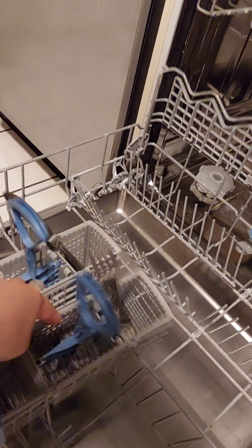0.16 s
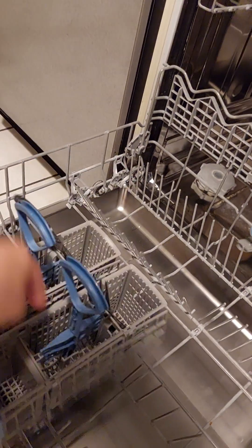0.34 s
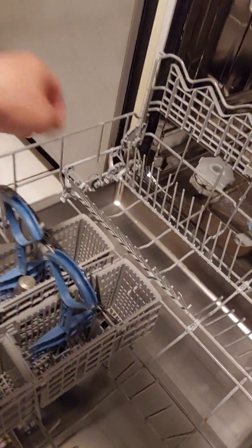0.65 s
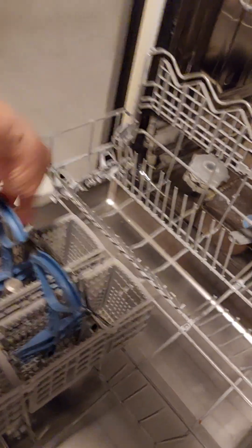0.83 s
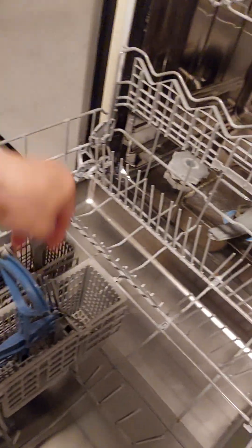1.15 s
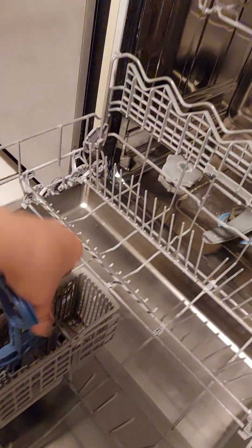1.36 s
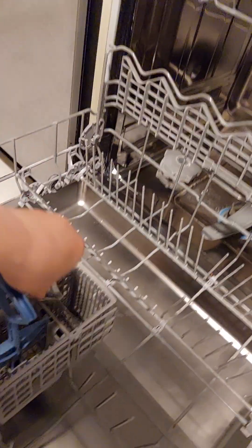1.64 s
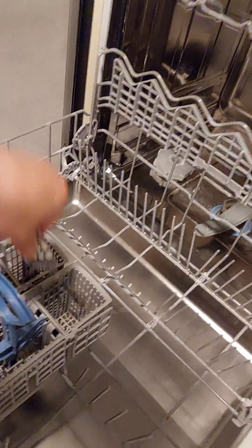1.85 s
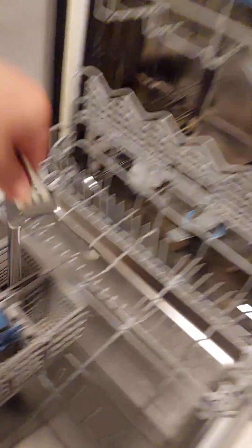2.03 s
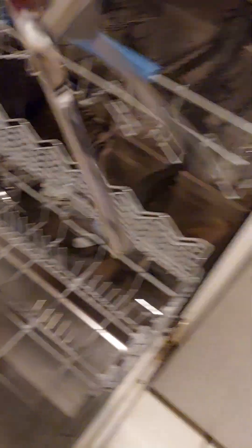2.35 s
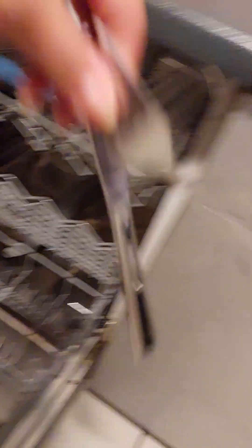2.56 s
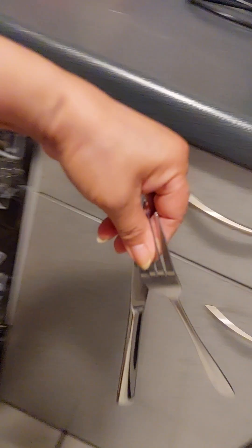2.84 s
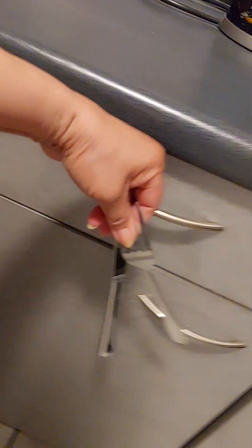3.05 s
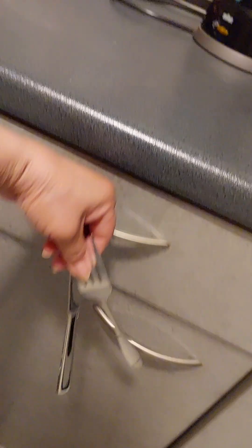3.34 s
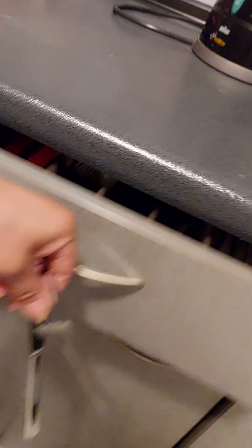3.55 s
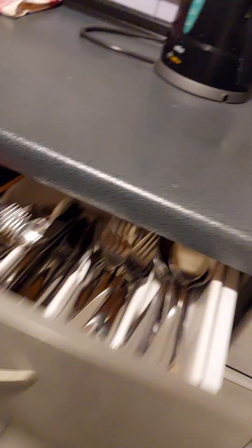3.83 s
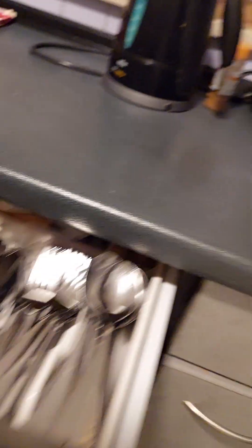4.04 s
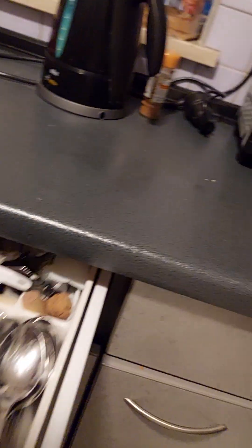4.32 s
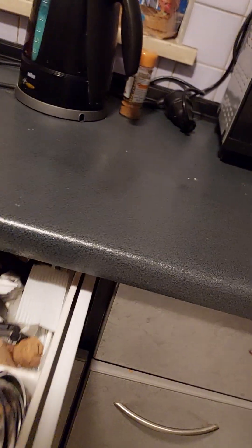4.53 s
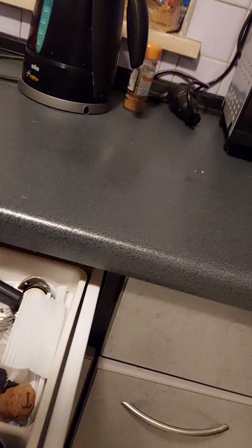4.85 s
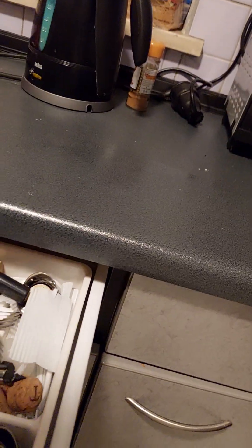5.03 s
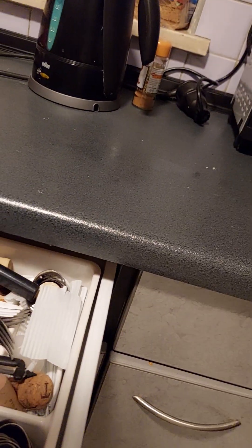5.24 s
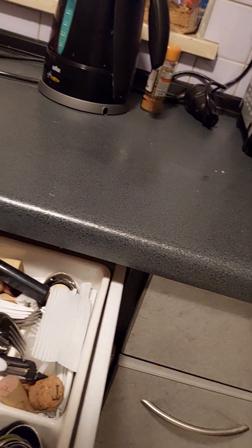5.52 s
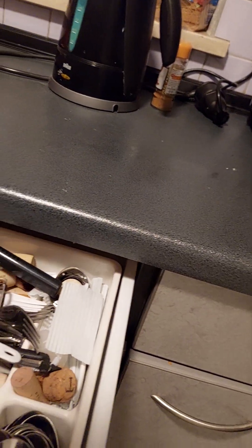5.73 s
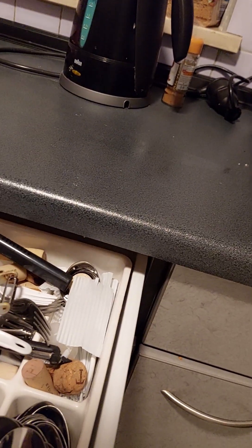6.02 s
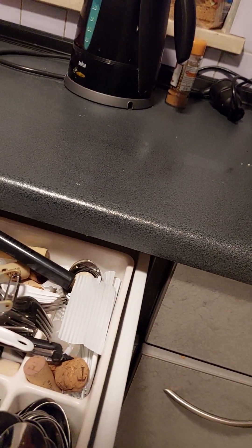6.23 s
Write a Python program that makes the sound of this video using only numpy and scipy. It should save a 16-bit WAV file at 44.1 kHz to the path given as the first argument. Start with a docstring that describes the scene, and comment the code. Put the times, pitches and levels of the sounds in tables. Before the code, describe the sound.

In a small hard kitchen, close up in stereo, a plastic basket of cutlery thumps and jingles into a dishwasher, leaving the wire rack humming and buzzing. Softer knocks and clinks follow as a knife and fork are drawn out. After a near-quiet gap a drawer rumbles open, bangs against its stop, and the pieces fall clattering and ringing onto other cutlery.

```python
"""A small hard kitchen, heard from arm's length. A plastic cutlery basket is set down in a dishwasher,
whose wire rack hums on in close beating modes. A knife and fork are drawn out and tick together in the hand.
A drawer rolls open (swept resonances over rumble) and bangs against its stop; the pieces drop on the cutlery
in its tray. Blows are noise flurries through coloured bodies, pieces ring in split modes, scrapes are
strokes of gritty noise; a diffuse echo and steady room noise surround them."""
import sys
import numpy as np
from scipy import signal
from scipy.fft import rfft, irfft, next_fast_len
from scipy.io import wavfile

SR = 44100
rng = np.random.default_rng(int(sys.argv[2]) if len(sys.argv) > 2 else 0)


def generate_wav(sig):
    """Save sig (samples, or channels by samples) to the path in sys.argv[1] as 16-bit PCM at SR."""
    pcm = np.round(np.clip(np.atleast_2d(sig).T, -1, 1) * 32767).astype(np.int16)
    wavfile.write(sys.argv[1], SR, pcm)


N = 281358
TIME = np.arange(N) / SR


def from_db(db):
    """Amplitude ratio of a level."""
    return 10 ** (np.asarray(db) / 20)


def rms_one(x):
    """Scale to rms 1."""
    return x / np.sqrt(np.mean(x ** 2) + 1e-20)


def at_hz(points, hz):
    """Read a table on a log-frequency axis."""
    table_hz, values = np.array(points).T
    return np.interp(np.log(np.maximum(hz, 1)), np.log(table_hz), values)


def band(x, low_hz, high_hz):
    """Causal band-pass."""
    return signal.sosfilt(signal.butter(3, [low_hz, high_hz], "band", fs=SR, output="sos"), x)


def through(x, response):
    """Convolve each channel with an impulse response, cut to the scene's length."""
    return signal.oaconvolve(x, np.atleast_2d(response), axes=1)[:, :N]


def resonator(hz, width_hz):
    """Filter coefficients of a resonance with gain 1 on top."""
    r = np.exp(-np.pi * width_hz / SR)
    feedback = [1, -2 * r * np.cos(2 * np.pi * hz / SR), r * r]
    return (1 - r * r) / 2 * np.array([1, 0, -1]), feedback


def drift(rate_hz):
    """Slow random curve, rms 1."""
    knots = rng.standard_normal(int(N / SR * rate_hz) + 2)
    return rms_one(np.interp(TIME * rate_hz, np.arange(len(knots)), knots))


def swell(start_s, attack_s, hold_s, release_db_per_s):
    """Envelope that rises, holds until hold_s after its start and dies away."""
    age_s = TIME - start_s
    return np.clip(age_s / attack_s, 0, 1) * from_db(-release_db_per_s * np.maximum(age_s - hold_s, 0))


def causal(colour, size=4096):
    """Minimum-phase impulse response of a colour, by folding its cepstrum."""
    cepstrum = irfft(np.log(from_db(at_hz(colour, np.fft.rfftfreq(size, 1 / SR)))))
    cepstrum[1:size // 2] *= 2
    cepstrum[size // 2 + 1:] = 0
    return irfft(np.exp(rfft(cepstrum)))


# Left-right likeness of diffuse sound. Each row: frequency in Hz, correlation (-1 to 1).
LIKENESS = [(150, 0.81), (300, 0.97), (600, .55), (1200, 0.047), (2500, -.2), (5000, 0.02)]


def two_ears(x):
    """Mix two unrelated signals until they are alike in the bass, where the waves are long."""
    size = next_fast_len(x.shape[1])
    likeness = at_hz(LIKENESS, np.fft.rfftfreq(size, 1 / SR))
    angle = np.arcsin(np.clip(likeness, -1, 1)) / 2
    spectrum = rfft(x, size)
    mixed = np.cos(angle) * spectrum + np.sin(angle) * spectrum[::-1]
    return irfft(mixed, size)[:, :x.shape[1]]


def noise(colour, grain_db=0):
    """Coloured stereo noise, gritty when its grains differ in size; rms 1."""
    grains = rng.standard_normal((2, N)) * from_db(grain_db * drift(400))
    return rms_one(two_ears(through(grains, causal(colour))))


# Colour of the quiet room. Each row: frequency in Hz, relative level in dB.
QUIET_COLOUR = [(15, -39.5), (25, -7.5), (64, 2.5), (190, -4.5), (249, 0), (405, -12.5), (887, -23),
                (2690, -27), (3250, -27.5), (11300, -29), (16000, -34)]
QUIET_DB = -66.5


def quiet_room():
    """Steady coloured noise of the room."""
    return from_db(QUIET_DB) * noise(QUIET_COLOUR)


# Decay of the kitchen's echo. Each row: frequency in Hz, t60 in s.
KITCHEN_DECAY = [(100, .45), (1500, 0.39), (4000, 0.37), (9000, 0.27), (15000, 0.24)]


def kitchen(size=26000):
    """Diffuse echo of about unit energy; the treble dies first."""
    t, edges_hz = TIME[:size], np.geomspace(40, 19000, 13)
    spectrum = rfft(two_ears(rng.standard_normal((2, size))))
    hz, tail = np.fft.rfftfreq(size, 1 / SR), 0
    for low, high in zip(edges_hz, edges_hz[1:]):
        t60_s = at_hz(KITCHEN_DECAY, np.sqrt(low * high))
        part = irfft(spectrum * ((hz >= low) & (hz < high)), size) * from_db(-60 * t / t60_s)
        part = part * (1 - np.exp(-t / 0.00053))    # soft onset
        tail = tail + rms_one(part) * np.sqrt((high - low) / (SR / 2) / size)
    return tail


# Pushes that set the rack swaying. Each row: start in seconds, level in dB, t60 in s.
RACK_PUSHES = [(.12, -27, 2.2), (.52, -34, 1.32), (1.26, -40, 0.95), (1.529, -43, 1.4), (1.88, -43.5, 1.0)]
# Close modes of the rack. Each row: frequency in Hz, relative level in dB.
RACK_MODES = [(234.5, -2.5), (227, -8), (214.7, -11)]
# Loose wires and handles that buzz. Each row: frequency in Hz, width in Hz, relative level in dB.
RACK_BUZZ = [(1165, 72, -4), (2300, 150, -3), (3180, 110, 0), (4640, 170, -3), (7300, 90, -11)]
RACK_RISE_S = 0.048


def rack(waver_rad, hum_db, buzz_db, chatter_db, buzz_growth):
    """Pushes set the wire rack humming in modes that beat; the harder it sways, the more loose parts chatter."""
    power = 0
    for start_s, push_db, t60_s in RACK_PUSHES:
        push = from_db(push_db) * swell(start_s, RACK_RISE_S, RACK_RISE_S, 60 / t60_s)
        power = power + push ** 2
    sway = np.sqrt(power)
    hum = 0
    for hz, db in RACK_MODES:
        hum = hum + from_db(db) * np.sin(2 * np.pi * hz * TIME + waver_rad * drift(16))
    touches = rng.standard_normal((2, N)) * from_db(chatter_db * drift(70))
    buzz = 0
    for hz, width_hz, db in RACK_BUZZ:
        buzz = buzz + from_db(db) * rms_one(signal.lfilter(*resonator(hz, width_hz), touches))
    looseness = (sway / sway.max()) ** buzz_growth
    return sway * (from_db(hum_db) * rms_one(hum) + from_db(buzz_db) * looseness * rms_one(buzz))


PULL_S, PULL_LENGTH_S, STOP_S = 3.456, 0.38, 4.83
SPEED_LEFT_AT_STOP = 0.49   # share of the top speed


def drawer_motion():
    """Speed (top 1) and travel (0 to 1): pulled up to speed, the drawer coasts and slows until its stop."""
    speed = np.interp(TIME, [PULL_S, PULL_S + PULL_LENGTH_S, STOP_S], [0, 1, SPEED_LEFT_AT_STOP], right=0)
    return speed, np.cumsum(speed) / np.sum(speed)


def swept(x, centre_hz, width_hz, size=512):
    """Resonance that follows a moving centre, block by block; rms 1."""
    out, state = np.zeros((2, N)), np.zeros((2, 2))
    for i in range(0, N, size):
        coefficients = resonator(centre_hz[i], width_hz)
        out[:, i:i + size], state = signal.lfilter(*coefficients, x[:, i:i + size], zi=state)
    return rms_one(out)


# Colour of the rolling. Each row: frequency in Hz, relative level in dB.
ROLL_COLOUR = [(24, -46), (40, -11), (112, -11.5), (147, 0.5), (183, -6), (346, -4.5), (487, -2.5),
               (593, -11), (856, -12.5), (1540, -23), (14000, -52)]
ROLL_DB = -41.5   # mean at top speed, before the mix of rumble and rails
LOWER_RUNNER_HZ, UPPER_RUNNER_HZ = (240.5, 411), (1138, 640)   # shut, fully out


def runners(rumble_db, lower_db, upper_db):
    """Rollers rumble along the rails, louder with speed, and excite resonances that shift with the travel."""
    speed, travel = drawer_motion()
    lower_hz = np.interp(travel, [0, 1], LOWER_RUNNER_HZ)
    upper_hz = np.interp(travel, [0, 1], UPPER_RUNNER_HZ)
    rumble = from_db(rumble_db) * noise(ROLL_COLOUR, grain_db=-0.5)
    drive = noise(ROLL_COLOUR, grain_db=1.5)
    rails = from_db(lower_db) * swept(drive, lower_hz, width_hz=19)
    rails = rails + from_db(upper_db) * swept(drive, upper_hz, width_hz=57)
    return speed * from_db(ROLL_DB + 2.26 * drift(35)) * (rumble + rails)


# Soft scrapes and sliding cutlery.
# Each row: start in seconds, length in s, level in dB, brightness in dB per octave.
SCRAPES = [(1.808, 0.34, -57.5, -4), (1.897, .11, -58, -1), (2.518, 0.037, -66.5, -2.5),
           (2.65, 0.042, -65, -1.5), (2.897, 0.069, -57.5, 1.5), (3.15, 0.024, -57, -3),
           (3.492, 0.24, -69.5, -4.5), (3.99, .06, -64, -2), (4.065, 0.049, -56, -.5),
           (4.215, 0.14, -50, -.5)]
# Colour of sliding steel. Each row: frequency in Hz, relative level in dB.
SLIDE_COLOUR = [(1200, -7.5), (2400, 2), (3300, -4), (7200, -5.5), (9000, -8.5), (11400, -3.5), (16000, -8)]
SCRAPE_ATTACK_SHARE, SCRAPE_RELEASE_DB_PER_S = 0.27, 396.5   # attack: share of the stroke's length


def scrapes():
    """Strokes of fine friction noise, each with its own brightness; the short ones start sharply."""
    out = 0
    for start_s, length_s, stroke_db, brightness in SCRAPES:
        colour = [(hz, db + brightness * np.log2(hz)) for hz, db in SLIDE_COLOUR]
        stroke = swell(start_s, SCRAPE_ATTACK_SHARE * length_s, length_s, SCRAPE_RELEASE_DB_PER_S)
        out = out + from_db(stroke_db) * stroke * noise(colour, grain_db=-1)
    return out


def rattle(blows, contacts, count, grain_db, size=10000):
    """Each blow is a dying flurry of uneven bounces, shared out among the registers by its contact."""
    out, t = np.zeros((count, 2, N + size)), TIME[:size]
    for start_s, length_s, blow_db, contact, _ in blows:
        bounces = np.repeat(from_db(grain_db * rng.standard_normal(size // 40)), 40)
        flurry = rng.standard_normal((count, 2, size)) * bounces * np.exp(-t / length_s)
        # energy grows with length
        flurry *= np.sqrt(length_s * SR / 2 / np.sum(flurry ** 2, axis=2, keepdims=True))
        start = round(start_s * SR)
        gains = from_db(blow_db + np.array(contacts[contact]))
        out[..., start:start + size] += flurry * gains[:, None, None]
    return out[..., :N]


def pile(count=260, size=12000):
    """Cutlery in a heap: scattered modes, quickly damped by the neighbours; unit energy."""
    t = TIME[:size]
    hz = rng.uniform(2500, 16000, (count, 1))
    t60_s = 0.1 * rng.uniform(0.52, 2.4, (count, 1))
    strength = rng.standard_normal((count, 1))
    modes = strength * np.sin(2 * np.pi * hz * t) * from_db(-60 * t / t60_s)
    return rms_one(np.sum(modes, axis=0)) / np.sqrt(size)


def struck(blows, contacts, colour, registers, grain_db, hollows=(), pile_db=-60):
    """A body answers each blow in every register as its contact drives it; the heap in it jingles."""
    plain = causal(colour)
    body = plain
    for hz, width_hz, db in hollows:
        body = body + from_db(db) * signal.lfilter(*resonator(hz, width_hz), plain) / 2
    jingle = from_db(pile_db) * pile()
    jingle[0] += 1    # the blow itself
    body, out = signal.fftconvolve(body, jingle), 0
    for drive, (low_hz, high_hz) in zip(rattle(blows, contacts, len(registers), grain_db), registers):
        response = band(body, low_hz, high_hz)
        out = out + through(drive, response / np.sqrt(np.sum(response ** 2)))
    return two_ears(out)


# Registers of a blow: thud, knock, clack, steel. Each row: low edge in Hz, high edge in Hz.
REGISTERS = [(55, 300), (300, 1800), (1800, 7000), (7000, 17000)]
# Knocks of the loaded basket.
# Each row: start in seconds, rattle decay in s, level in dB, contact, piece left ringing.
BASKET_BLOWS = [(.002, .019, -35, "bump", None), (.081, .06, -42.5, "knock", None),
                (.111, .005, -21, "slap", None), (.117, .028, -20.5, "bump", None),
                (.166, .02, -23.5, "jostle", None), (.194, 0.011, -14.5, "jostle", None),
                (.199, 0.01, -10, "slap", None), (.209, .036, -26, "knock", None),
                (.25, 0.011, -15, "jostle", None), (.264, .013, -20.5, "jostle", None),
                (.317, .022, -26, "knock", None), (.357, .03, -42, "bump", None),
                (.55, 0.1, -52, "bump", None), (.8, 0.12, -61, "bump", None),
                (.986, 0.0114, -48.5, "bump", None), (1.09, 0.011, -52, "knock", None),
                (1.115, 0.023, -44.5, "thud", None), (1.221, 0.0082, -40.5, "knock", None),
                (1.238, 0.019, -41.5, "knock", None), (1.274, 0.015, -37.5, "knock", None),
                (1.297, 0.0061, -30, "thud", None), (1.55, .015, -42, "thud", None),
                (1.7, 0.064, -51.5, "bump", None), (1.765, 0.051, -47, "bump", None),
                (1.93, .018, -48.5, "knock", "tines"), (1.99, 0.018, -46, "bump", "tines")]
# Ways the basket is knocked. Each row: thud in dB, knock in dB, clack in dB, steel in dB.
BASKET_CONTACTS = { "thud": (1.5, -8, -17, -37), "bump": (0, -4.5, -10.5, -20.5),
                   "knock": (-0.5, -0.5, 0.5, -8), "slap": (-13, -1.5, -2, -17.5),
                   "jostle": (-10, -12.5, 0.5, -4.5), }
# Colour of the basket. Each row: frequency in Hz, relative level in dB.
BASKET_COLOUR = [(24, -47.5), (40, -18.5), (69, -6), (167, -7), (209, 2.5), (556, -10.5), (831, -16),
                 (1090, -11.5), (1550, -16.5), (2210, -16), (4030, -26), (12500, -29), (16000, -31)]


def basket():
    """The plastic basket knocks and its load of cutlery jingles."""
    return struck(BASKET_BLOWS, BASKET_CONTACTS, BASKET_COLOUR, REGISTERS, grain_db=4, pile_db=-11.0)


# Light touches of steel on steel.
# Each row: start in seconds, rattle decay in s, level in dB, contact, piece left ringing.
CLINK_BLOWS = [(0.492, 0.018, -38.5, "handle", None), (0.519, 0.017, -36.5, "handle", None),
               (.657, 0.0047, -45.5, "handle", None), (0.715, 0.016, -49.5, "handle", None),
               (0.987, 0.0088, -37.5, "shaft", None), (1.533, 0.016, -42.5, "shaft", "blade"),
               (2.336, 0.0014, -34.5, "tip", "tines"), (2.426, .003, -53, "tip", None),
               (2.49, 0.0017, -40, "tip", None), (2.566, 0.0009, -36.5, "tip", None)]
# Ways two pieces touch. Each row: clack in dB, steel in dB.
CLINK_CONTACTS = {"handle": (0, -14), "shaft": (-6, 0), "tip": (-21, 0)}
# Colour of the clinks. Each row: frequency in Hz, relative level in dB.
CLINK_COLOUR = [(1500, 5.5), (4700, 2), (5800, -5.5), (7000, 0.5), (9000, -10.5), (15000, -4)]


def clinks():
    """Pieces tick together, in the two upper registers only."""
    return struck(CLINK_BLOWS, CLINK_CONTACTS, CLINK_COLOUR, REGISTERS[2:], grain_db=2.5)


# A soft footfall, then blows in the drawer and tray: pull, end stop and rebound, knife touching down,
# fall and bounce, settling.
# Each row: start in seconds, rattle decay in s, level in dB, contact, piece left ringing.
DRAWER_BLOWS = [ (3.099, .02, -69, "soft bump", None), (3.57, 0.045, -62.5, "soft bump", None),
                (3.772, 0.03, -31.5, "heap jolted", None), (3.789, .023, -27, "heap jolted", None),
                (4.584, 0.0032, -59, "soft bump", None), (4.819, 0.011, -28, "end stop", None),
                (4.828, 0.022, -20.5, "end stop", None), (4.835, .016, -13.5, "end stop", None),
                (4.846, 0.027, -15.5, "heap jolted", None),
                (4.85, 0.021, -29.5, "cabinet shudder", "carcass"),
                (4.96, 0.026, -39, "cabinet shudder", "carcass"), (5.015, 0.0052, -26.5, "end stop", None),
                (5.128, 0.021, -32.5, "steel on steel", "knife"), (5.169, 0.0099, -27, "heap jolted", None),
                (5.231, 0.0048, -33, "steel on steel", None), (5.275, 0.006, -42, "steel on steel", None),
                (5.299, 0.17, -32.5, "steel on steel", "knife"), (5.335, .01, -20, "handle on tray", None),
                (5.356, 0.0042, -17, "handle on steel", None), (5.364, .011, -15.5, "heap jolted", None),
                (5.378, .03, -19.5, "steel on steel", "fork"), (5.416, 0.0028, -17, "handle on tray", None),
                (5.438, 0.033, -24, "handle on steel", "fork"),
                (5.46, 0.0022, -13.5, "flat landing", "fork"),
                (5.625, .013, -34.5, "handle on steel", None),
                (5.685, 0.0066, -21.5, "steel on steel", None),
                (5.81, 0.044, -31, "steel on steel", "fork"), (5.837, 0.0099, -26, "flat landing", None),
                (5.88, 0.017, -31.5, "flat landing", None), (5.932, .0024, -37, "handle on steel", None),
                (5.971, .056, -32, "steel on steel", "fork"), (5.983, .015, -23.5, "flat landing", "fork"),
                (6.045, 0.023, -26.5, "steel on steel", None), (6.072, .014, -30.5, "handle on tray", None),
                (6.18, 0.0045, -45.5, "soft bump", None), (6.293, 0.048, -39.5, "steel on steel", "spoon"),
                (6.326, 0.011, -32, "soft bump", None)]
# What meets what. Each row: thud in dB, knock in dB, clack in dB, steel in dB.
DRAWER_CONTACTS = { "end stop": (-14, -1.5, -3.5, -15), "cabinet shudder": (0, -12, -25, -40),
                   "soft bump": (-18, -0.5, -12.5, -35), "heap jolted": (-16, -9, -7, -1),
                   "steel on steel": (-36.5, -15.5, -6.5, -1.5), "handle on steel": (-33, -11.5, -3, -5.5),
                   "handle on tray": (-38, -1, -2.5, -7), "flat landing": (-31.5, -4, -2.5, -2), }
# Colour of the drawer. Each row: frequency in Hz, relative level in dB.
DRAWER_COLOUR = [(24, -18), (40, -4), (81, -15), (151, -10.5), (180, -12), (320, -6.5), (412, -7.5),
                 (810, -3), (1520, -6), (2840, -6), (5720, -11.5), (12800, -5.5), (16000, -4.5)]
# Hollow resonances of the tray. Each row: frequency in Hz, width in Hz, relative level in dB.
TRAY_HOLLOWS = [(354, 25, 1.5), (818, 82, 0.5)]


def drawer():
    """All these blows share one body with the tray's hollow resonances and jingling cutlery."""
    return struck(DRAWER_BLOWS, DRAWER_CONTACTS, DRAWER_COLOUR, REGISTERS, grain_db=2.5,
                  hollows=TRAY_HOLLOWS, pile_db=-16.5)


# Modes of each piece. Each row: nominal frequency in Hz, nominal level in dB, t60 in s.
PIECE_MODES = { "blade": [(4500, -17, 0.22), (6700, 1, 0.074), (11360, -7, 0.12), (12600, -1.5, 0.18),
               (14500, 5, 0.12)], "tines": [(7950, -19, 0.11), (11240, -5, 0.16)],
               "knife": [(6250, -1, 0.12), (10010, -20, .4), (11000, 8, 0.26), (12340, 2, 0.39),
               (14700, -12, .5)], "fork": [(7951, -10, .42), (9508, -8, .3), (11086, -1, .26),
               (11718, -9, .26), (12707, -1, .26), (14358, 0, .25), (14733, -8, .26)],
               "spoon": [(9930, -14, 0.29), (11300, 0, 0.16), (12720, 5, 0.12), (14163, -13.5, 0.59)],
               "carcass": [(83.5, -2.5, 0.43), (108.2, -9, 0.63), (147, -2, 0.34)], }
# How strongly each piece rings, in dB, after a blow that rattles for TYPICAL_RATTLE_S.
PIECE_RING_DB = {"blade": 1, "tines": -2.5, "knife": -15, "fork": -1.5, "spoon": -2, "carcass": -3}
TYPICAL_RATTLE_S = .03


def ringing(blows, spread_db, split_hz, size=30000):
    """Free pieces ring with the blow's energy, in new mode strengths; each mode is a beating cluster."""
    out, t = np.zeros((2, N + size)), TIME[:size]
    for start_s, length_s, blow_db, _, piece in blows:
        if piece is None:
            continue
        start = round(start_s * SR)
        ring_db = blow_db + 10 * np.log10(length_s / TYPICAL_RATTLE_S) + PIECE_RING_DB[piece]
        for hz, mode_db, t60_s in PIECE_MODES[piece]:
            shortness = min(hz / 10000, 1)
            decay = from_db(-60 * t / t60_s)
            for share, detune in ((.8, 0), (.45, -1), (.45, 1)):
                partial_hz = hz + detune * shortness * split_hz * rng.uniform(0.56, 1.26)
                # short waves reach the sides out of step
                phase = rng.uniform(-np.pi, np.pi, (2, 1)) * shortness
                gain = share * from_db(ring_db + mode_db + spread_db * rng.standard_normal((2, 1)))
                out[:, start:start + size] += gain * np.sin(2 * np.pi * partial_hz * t + phase) * decay
    return out[:, :N]


# Where the cutlery is as it travels. Each row: time in seconds, left minus right in dB.
CUTLERY_PLACE = [(.7, -1.5), (1, 3), (2, 1.5), (2.35, 9), (3.8, 6), (4.8, -2.5), (5.3, 2)]


def placed(x):
    """Direct sound leans to the side where the cutlery is, at constant power gain."""
    time_s, left_right_db = np.transpose(CUTLERY_PLACE)
    lean_db = np.interp(TIME, time_s, left_right_db)
    sides = from_db([lean_db / 2, -lean_db / 2])
    return x * sides / np.sqrt(np.mean(sides ** 2, axis=0))


def scene():
    """Basket, cutlery and drawer, direct and through the kitchen, over rack, runners and quiet room."""
    quiet = quiet_room()
    sway = rack(waver_rad=.4, hum_db=0.5, buzz_db=-16, chatter_db=4.5, buzz_growth=0.49)
    roll = runners(rumble_db=-2.5, lower_db=-3.5, upper_db=-11.0)
    slide = scrapes()
    knocks = basket()
    ticks = clinks()
    bangs = drawer()
    rings = ringing(BASKET_BLOWS + CLINK_BLOWS + DRAWER_BLOWS, spread_db=4.0, split_hz=62.5)
    direct = knocks + ticks + from_db(1.95) * bangs + rings + slide
    to_echo = from_db(3.0) * knocks + from_db(-3.5) * ticks + from_db(-0.86) * bangs
    to_echo = to_echo + from_db(-2) * rings + from_db(-5) * slide
    return placed(direct) + through(to_echo, kitchen()) + sway + roll + quiet


# Colour difference of the two microphones. Each row: frequency in Hz, left minus right in dB.
MICROPHONES = [(60, 1.44), (3000, -3.5), (5500, 2.5), (10000, -0.5)]
CUTOFF_HZ = 15900


def record(dry):
    """Each microphone colours its side; the highest peaks are rounded and the top is cut."""
    colours = [causal([(hz, side * db / 2) for hz, db in MICROPHONES]) for side in (1, -1)]
    rounded = np.tanh(through(dry, colours))
    return signal.sosfilt(signal.ellip(12, .2, 80, CUTOFF_HZ, fs=SR, output="sos"), rounded)


dry = scene()
out = record(dry)
generate_wav(out)
```